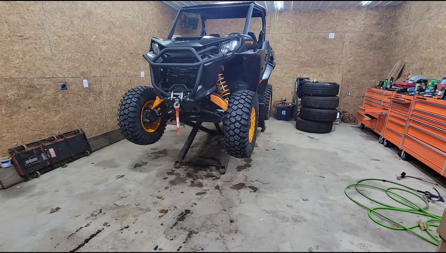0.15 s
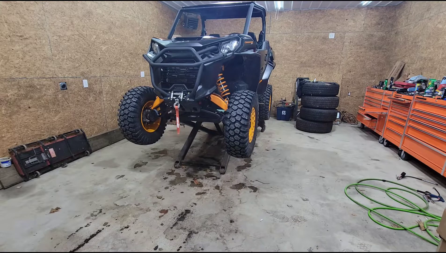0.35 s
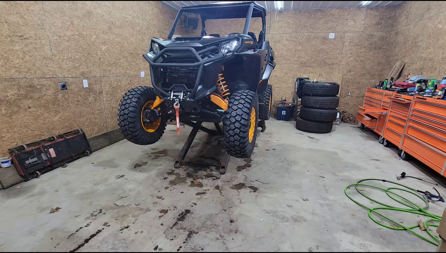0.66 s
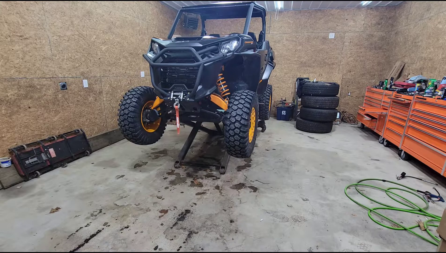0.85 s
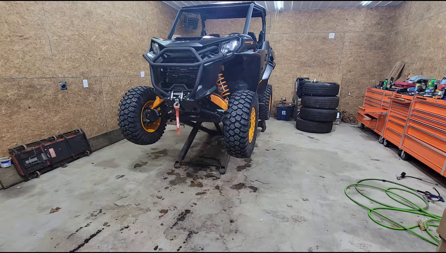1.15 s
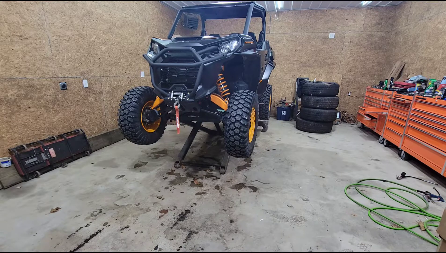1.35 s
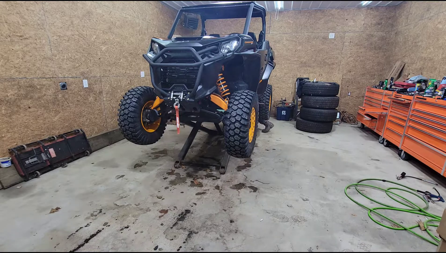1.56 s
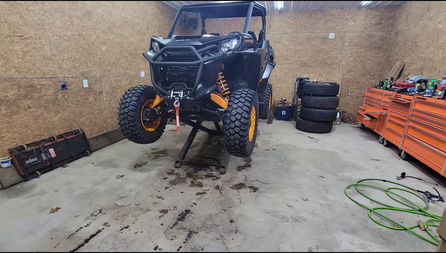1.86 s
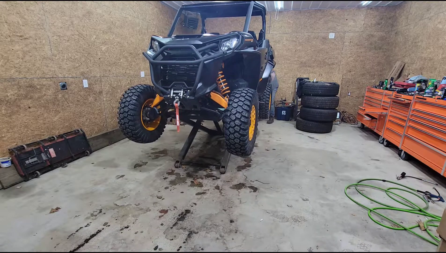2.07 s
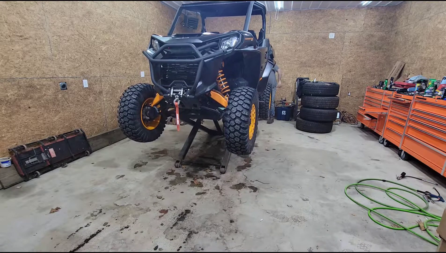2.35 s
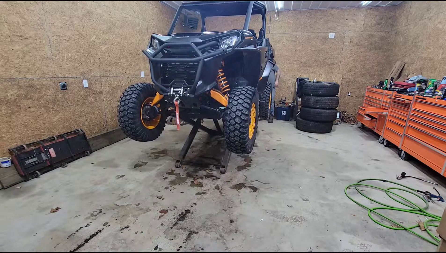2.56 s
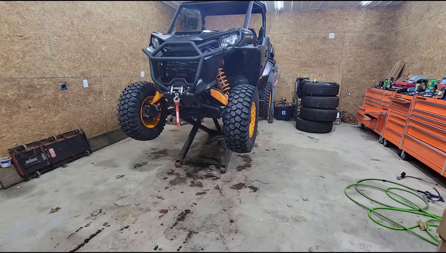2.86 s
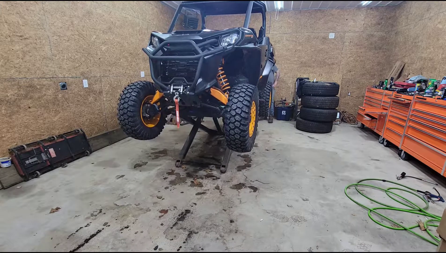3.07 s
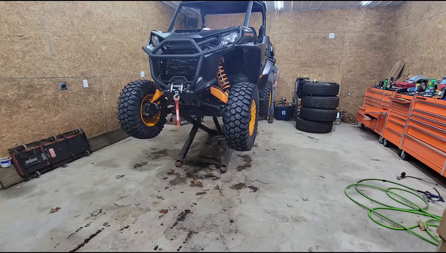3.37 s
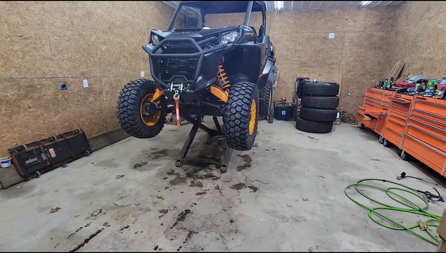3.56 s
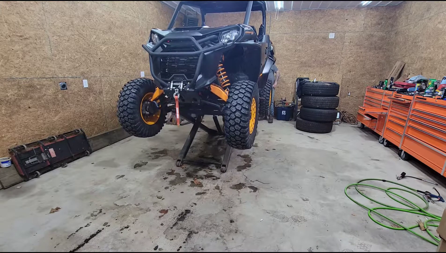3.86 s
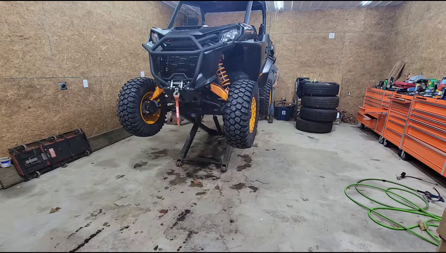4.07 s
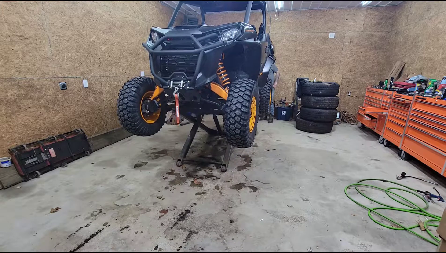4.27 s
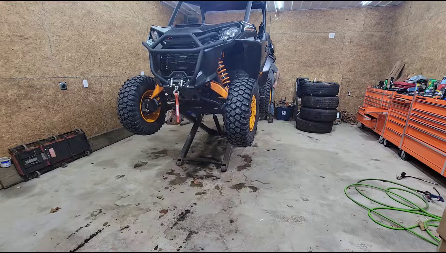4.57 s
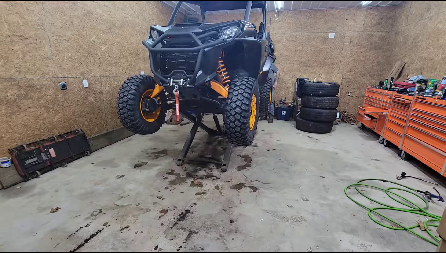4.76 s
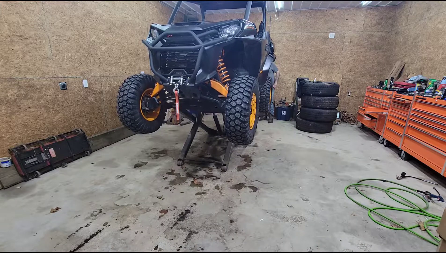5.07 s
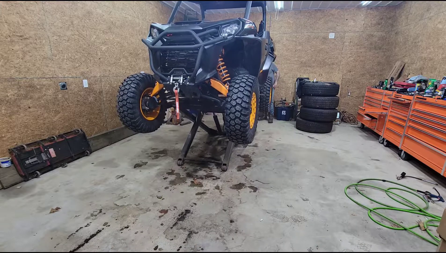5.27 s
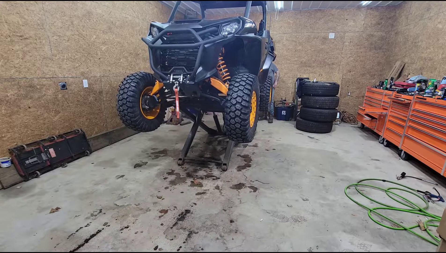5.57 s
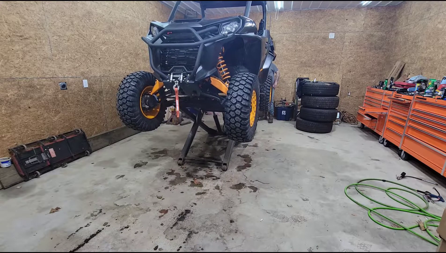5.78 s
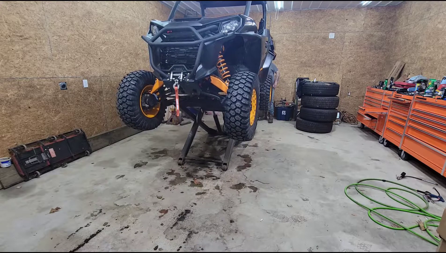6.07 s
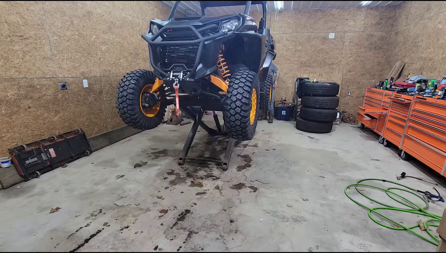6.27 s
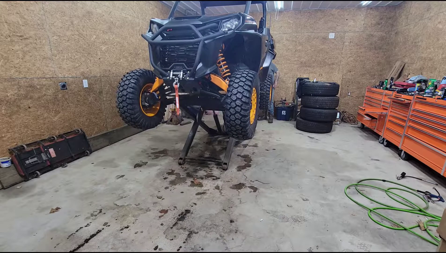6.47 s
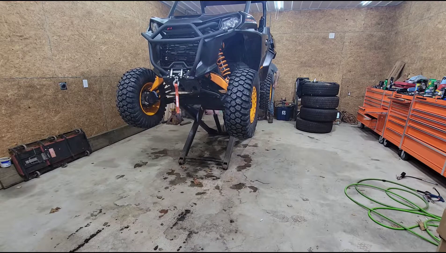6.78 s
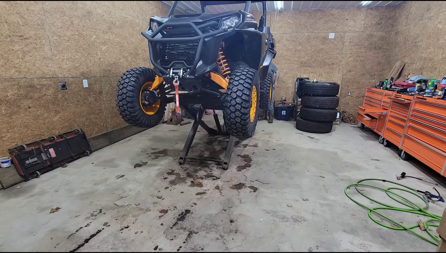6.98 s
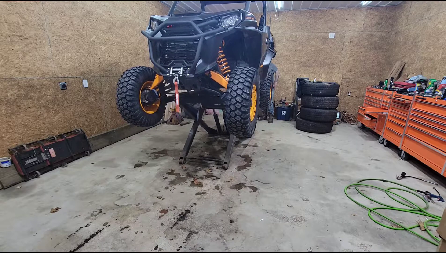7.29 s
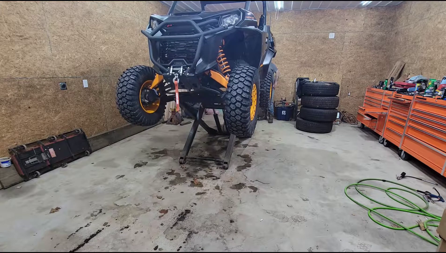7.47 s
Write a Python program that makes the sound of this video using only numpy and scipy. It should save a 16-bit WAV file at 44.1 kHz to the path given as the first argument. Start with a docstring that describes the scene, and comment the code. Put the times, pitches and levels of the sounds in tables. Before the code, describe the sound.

In a hard-walled garage, scuffs and a sharp metal clack, then a switch clicks and an electric-hydraulic lift hums and whines steadily, its safety catch ticking.

```python
"""Garage lift going up

An electric-hydraulic lift raises a vehicle in a hard-walled garage, over room air and a faint sinking hum.
Noise strokes make the scuffs; noise bursts with ringing modes make a sharp metal clack, footsteps and clicks.
The switch closes, the motor hums as sines, and a nine-tooth gear pump whines in partials locked to its shaft.
The whine shifts as pressure builds, the oil hiss flickers, and the safety catch clicks at each notch.
"""
import sys
import numpy as np
from scipy import signal
from scipy.fft import irfft, next_fast_len
from scipy.io import wavfile
from scipy.ndimage import uniform_filter1d

SR = 44100
rng = np.random.default_rng(int(sys.argv[2]) if len(sys.argv) > 2 else 0)


def wrap_up_sound(samples):
    """Save the sound to the file named by the first command line argument, as 16-bit audio."""
    columns = np.atleast_2d(samples).T
    # keep every value between -1 and 1, then stretch to whole-number steps
    tamed = np.clip(columns, -1, 1)
    steps = np.round(tamed * 32767).astype(np.int16)
    wavfile.write(sys.argv[1], SR, steps)


N = 336483
T = np.arange(N) / SR

# Likeness of the two microphones. Each row: frequency in Hz, correlation from 0 to 1.
LIKENESS = [(30, .6), (80, .8), (140, .88), (250, .91), (400, .45), (600, .2), (1000, 0), (2500, .15),
            (14000, .2)]
# Base decay of a blow in the garage. Each row: frequency in Hz, t60 in seconds before a blow's linger factor.
GARAGE_DECAY = [(100, 0.28), (300, 0.35), (600, 0.41), (1200, 0.43), (2700, 0.49), (5500, 0.43),
                (8000, 0.38), (14000, 0.3)]
EDGE_HZ = 15450  # top of the band

# Room air. Each row: frequency in Hz, relative level in dB per Hz.
AIR_COLOUR = [(20, -35.5), (55, -22.5), (85, -13.5), (100, -14), (130, -7), (155, -19.5), (200, -25),
              (500, -31), (1500, -25.5), (3500, -37.5), (9000, -39.5), (15000, -55.5)]
# The faint hum starts at one pitch and sinks exponentially towards another.
DRONE_START_HZ, DRONE_REST_HZ, DRONE_SINK_S = 161.5, 128, 6.9
DRONE_DB, DRONE_DB_PER_S = -61.5, 0.67
# Brief level shifts of the faint hum. Each row: centre in seconds, half length in seconds, change in dB.
DRONE_DIPS = [(.25, 0.18, 2.5), (1.45, 0.23, -10), (2.502, 0.33, -9), (4.397, 0.45, -15), (7.6, 0.5, -7)]

# Scuffs of cloth and soles. Each row: start in seconds, length in seconds, level in dB.
SCUFFS = [(-.03, 0.1, -37.5), (0.104, 0.062, -38), (.7, 0.036, -54), (0.917, 0.045, -58.5),
          (1.07, 0.043, -56), (1.387, 0.061, -51.5), (2.6, 0.075, -47.5)]
# Friction noise. Each row: frequency in Hz, relative level in dB per Hz.
SCUFF_COLOUR = [(180, -26.5), (300, -27.5), (482, -7), (532, -12.5), (975, -10), (1290, -8.5), (1420, -12),
                (2320, -3), (6620, -1), (15000, -9.5)]
SCUFF_RISE_S, SCUFF_FALL_DB_PER_S = 0.036, 157

# Footsteps. Each row: start in seconds, level in dB.
STEPS = [(.16, -55.5), (.7, -53.5), (1.027, -57.5), (1.105, -60), (1.88, -48.5), (1.974, -44.5),
         (2.225, -43)]
# Footstep noise. Each row: frequency in Hz, relative level in dB per Hz.
STEP_COLOUR = [(150, -52), (400, -6.5), (700, -0.5), (1100, -6), (1800, -14.5), (5000, -13.5), (14000, -20)]
# Hollow knock of a step. Each row: frequency in Hz, relative level in dB, t60 in seconds.
STEP_MODES = [(437, 4, 0.082), (546, 4, 0.16), (698, 5, .17), (934, 5, .13)]

# The sharp metal clack: a faint lead-in, the main hit and a weaker second hit.
# Each row: start in seconds, level in dB.
CLACKS = [(.4575, -32), (.462, -11.5), (.474, -18.5)]
# Clack noise. Each row: frequency in Hz, relative level in dB per Hz.
CLACK_COLOUR = [(40, -45.5), (100, -33.5), (190, -4), (270, -20), (340, -9), (480, -12), (750, -4.5),
                (1050, -5.5), (2050, -2.5), (2900, -5.5), (3700, 0.5), (6500, 5), (7900, -3.5), (8750, 5.5),
                (9800, -6), (11500, 1.5), (15000, -10.5)]
# Low jolts of the frame. Each row: start in seconds, level in dB.
JOLTS = [(.04, -47.5), (.492, -42.5), (1.68, -38)]
# Jolt noise. Each row: frequency in Hz, relative level in dB per Hz.
JOLT_COLOUR = [(25, -60), (50, -42), (90, -19), (130, -7.5), (200, 1.5), (400, -14), (800, -12),
               (2000, -33)]
# Ringing of the steel frame. Each row: frequency in Hz, relative level in dB, t60 in seconds.
STEEL_MODES = [(334, 0, .26), (721, -5, .37), (856, -3, .3), (1039, 2, .38), (1110, 1, .46),
               (1497, -2, .42), (1534, 0, .46), (1803, -3, .28), (2277, -5, .28), (3548, -5, .3),
               (3915, 4, .42), (5771, 1, .36), (5899, 2, .38), (6045, 0, .33), (6175, -1, .35),
               (6535, -1, .3), (6686, -2, .3), (6879, -2, .3), (7121, 1, .28), (8659, 1, .36),
               (8802, -4, .3), (10827, -4, .28)]

# Knock of the button being pressed. Each row: start in seconds, level in dB.
BUTTON = [(1.543, -54)]
# Ringing of the button. Each row: frequency in Hz, relative level in dB, t60 in seconds.
BUTTON_MODES = [(800, -7, .08), (950, 2, 0.067)]
# Clicks of the switch. Each row: start in seconds, level in dB.
SWITCH = [(1.633, -34), (1.655, -36.5), (1.688, -38), (1.715, -47)]
# Noise of switch and button. Each row: frequency in Hz, relative level in dB per Hz.
SWITCH_COLOUR = [(120, -32), (220, -19), (500, -37), (700, -16), (930, 1), (1200, -6), (1600, -17),
                 (2100, -14), (2750, -14), (4500, -19), (7500, -16.5), (15000, -24.5)]
# Ringing of the switch box. Each row: frequency in Hz, relative level in dB, t60 in seconds.
SWITCH_MODES = [(745, -7, 0.06), (964, 8, 0.05), (1103, 3, 0.064), (1395, -3.5, .08)]

# Ticks of the safety catch riding over a notch. Each row: start in seconds, level in dB.
CATCH_TICKS = [(2.93, -39.5), (2.945, -45), (2.961, -52), (2.978, -47), (5.222, -42), (5.234, -44),
               (5.246, -42.5), (7.501, -42.5), (7.516, -46)]
# Clatter of the safety catch. Each row: frequency in Hz, relative level in dB per Hz.
CATCH_COLOUR = [(300, -20), (900, -3.5), (1650, 4), (2500, -3), (3300, 1), (5000, -2), (5800, -2),
                (7500, -2), (8700, -3.5), (9600, -10), (13000, -6), (15000, -33)]
# Ringing of the safety catch. Each row: frequency in Hz, relative level in dB, t60 in seconds.
CATCH_MODES = [(3290, 1.5, 0.2), (4060, -2, 0.15), (8600, 1.5, .22)]
# The catch drops on its bar and bounces. Each row: start in seconds, level in dB.
DROPS = [(2.932, -49), (2.961, -50), (5.231, -39), (5.246, -44), (5.26, -59)]
# Ringing of the bar. Each row: frequency in Hz, relative level in dB, t60 in seconds.
BAR_MODES = [(1500, -12, 0.062), (1592, -1, 0.23), (1628, -3, 0.14), (1876, 0.5, 0.082)]
# Squeak of the catch on the last notch. Each row: start in seconds, level in dB.
SQUEAKS = [(7.517, -56.5)]
# Ringing of the squeak. Each row: frequency in Hz, relative level in dB, t60 in seconds.
SQUEAK_MODES = [(5700, 0, 0.062), (5760, 3, 0.14), (6000, -4, .06)]

MOTOR_START_S, SHAFT_HZ = 1.635, 59.414  # power on, full shaft speed
# Oil pressure. Each row: time in seconds, share of full pressure from 0 to 1.
PRESSURE = [(2.6, 0.19), (6.6, 1)]
# Magnetic hum at four times the mains frequency: unloaded level, rise at full pressure, steepness of that law.
HUM_DB, HUM_RISE_DB, HUM_POWER = -57.5, 8, 2.3
# Low thrum of the motor. Each row: frequency in Hz, relative level in dB per Hz.
THRUM_COLOUR = [(40, -31), (58, -8), (70, -3), (83, -5), (95, -7), (108, -12), (125, 10), (150, 13.5),
                (175, -12), (270, 2.0), (350, -34), (900, -70)]

# Strong partials of motor and pump; close pairs beat.
# Each row: multiple of the shaft speed, level in dB at zero pressure, level in dB at full pressure.
STRONG_PARTIALS = [(9, -58, -62), (16.15, -69, -67), (17, -70, -65), (17.15, -67, -63), (18, -58, -55.5),
                   (19.93, -63, -61), (20.19, -66, -66), (24, -70, -68), (27, -69, -70), (28, -65.5, -64),
                   (32, -60, -66), (45, -75, -65), (70, -67, -66), (71, -65, -67), (72, -68, -62),
                   (73, -62, -67), (74, -64, -66), (79, -65, -65), (81, -65, -67), (88, -66, -71),
                   (90, -70, -68), (108, -61, -66), (109, -66, -65), (110, -66, -64), (112, -70, -67),
                   (115, -60, -59.5), (116, -65, -60), (117, -61, -63), (120, -67, -63), (121, -69, -62),
                   (121.04, -72, -67), (122, -67, -64), (122.04, -69, -66), (125, -64, -62),
                   (126, -65, -62), (127, -65, -68), (132, -68, -68), (133, -68, -69), (144, -69, -71),
                   (198, -69, -74)]
# A partial sings out as pressure builds.
# Each row: peak time in seconds, half length in seconds, multiple of the shaft speed, added level in dB.
SWELLS = [(2.03, 0.3, 9, -60.5), (3.14, 0.65, 9, -67), (6.9, 0.49, 9, -67.5), (4.5, 1.46, 24, -60.5),
          (5.3, 0.21, 27, -58), (6.6, .45, 27, -59.5), (4.2, 0.47, 45, -70), (5.73, 0.58, 45, -78),
          (3, 0.25, 72, -57.5), (4.7, 0.56, 72, -63), (7, .45, 72, -64.5), (7.37, 0.13, 72, -67),
          (4.03, 0.59, 73, -62), (2.64, 0.21, 79, -62), (3, 0.64, 88, -61.5), (4.43, 0.44, 90, -61),
          (6.32, .35, 90, -53.5), (3.38, 0.81, 108, -53), (4.87, 0.25, 108, -49), (3.3, 0.27, 109, -66),
          (5.05, 0.26, 112, -56), (5.2, 0.21, 116, -73), (6.89, 0.49, 117, -50.5), (2.98, 0.28, 126, -56),
          (4.22, 0.18, 126, -61), (6.6, 0.17, 126, -69), (5.1, 0.44, 127, -59)]
# The pump's fourth tooth harmonic and its neighbour throb together.
# Each row: multiple of the shaft speed, relative level in dB at zero pressure, the same at full pressure.
THROBBING = [(36, 0, 0), (37, -1, -9)]
THROB_HZ, THROB_TOP_S = 4.78, 3.755  # throbs per second, time of one peak
# Throbbing whine. Each row: time in seconds, level in dB.
THROB_LEVEL = [(2.1, -53), (2.32, -48), (2.75, -55), (3.3, -53.5), (3.73, -51), (4.0, -52.5), (5.0, -51),
               (5.8, -55), (6.3, -54), (6.8, -58.5), (7.4, -54.5)]
# Weak shaft harmonics, the strong partials left out.
# Each row: frequency in Hz, relative mean level of a harmonic in dB.
BUZZ_COLOUR = [(300, -103), (420, -72), (710, -69.5), (1100, -68.5), (1750, -92), (2150, -58), (2500, -100),
               (3400, -91), (3900, -69.5), (4500, -81.5), (5500, -68), (6100, -80.5), (7000, -74),
               (8100, -75.5), (9100, -81.5), (11300, -77.5), (14500, -78.5)]
# Oil rushing through pump and valve. Each row: frequency in Hz, relative level in dB per Hz.
OIL_COLOUR = [(90, -17), (200, 0.5), (280, -1.5), (370, -29), (560, 1), (800, -13), (1050, 4), (1300, -14),
              (1500, 3.5), (1800, -6), (2150, 8), (2450, -1), (3550, -2.5), (4200, 4), (5200, 0),
              (6000, -1.5), (7000, -2), (8300, 0.5), (9000, -8), (10500, -1), (12500, -3), (15500, -16.5)]
# A broad lift in the buzz and hiss that moves between 6.3 and 7.1 kHz.
# Each row: time in seconds, centre in Hz.
BAND_GLIDE = [(3.2, 6340), (4.8, 6640), (5.6, 6400), (6.8, 6900), (7.6, 7140)]


def gain_of(db):
    """Decibels to a factor."""
    return 10 ** (np.asarray(db) / 20)


def evened(x):
    """Scales to rms 1."""
    return x / np.sqrt(np.mean(x ** 2) + 1e-20)


def read(points, hz):
    """Reads a spectrum on a log-frequency axis."""
    f, value = np.transpose(points)
    return np.interp(np.log(hz + 1), np.log(f + 1), value)


def curves(rows):
    """The columns of a timed table, at every sample."""
    s, *columns = np.transpose(rows)
    return [np.interp(T, s, column) for column in columns]


def bell(s, half_length):
    """A smooth rise and fall of height 1 around time s, down to 1/e at the half length."""
    return np.exp(-((T - s) / half_length) ** 2)


def add(mix, s, sound):
    """Adds a stereo sound from time s on."""
    part = mix[:, round(s * SR):][:, :sound.shape[1]]
    part += sound[:, :part.shape[1]]


def wander(rate):
    """Random motion of rms 1, gliding between `rate` random points a second."""
    return evened(np.interp(T * rate, np.arange(1024), rng.standard_normal(1024)))


def noise(colour, size=N):
    """Coloured stereo noise of rms 1, alike in the bass and diffuse above; it reaches the left first."""
    padded = next_fast_len(size)
    hz = np.fft.rfftfreq(padded, 1 / SR)
    a, b = rng.standard_normal((2, len(hz))) + 1j * rng.standard_normal((2, len(hz)))
    same = np.clip(read(LIKENESS, hz), -1, 1)
    mid = a * np.sqrt(1 + same)
    side = b * np.sqrt(1 - same)
    later = np.exp(-2j * np.pi * hz * .00014)  # delay in seconds
    spectrum = np.array([mid + side, (mid - side) * later]) * gain_of(read(colour, hz))
    return evened(irfft(spectrum, padded)[:, :size])


def ports(hz):
    """Phase of each steady tone at the two microphones, set by the room's standing waves."""
    apart = np.arccos(np.clip(read(LIKENESS, hz), -1, 1)) * rng.choice([-1, 1], len(hz))
    return np.exp(2j * np.pi * rng.random(len(hz)) + .5j * np.array([apart, -apart]))


def background(air_db=-66, waver_db=2):
    """Room air as coloured noise, and the faint sinking hum as one unsteady sine."""
    hz = DRONE_REST_HZ + (DRONE_START_HZ - DRONE_REST_HZ) * np.exp(-T / DRONE_SINK_S)
    hz = hz + 1.5 * wander(4.7)
    dips = sum(dip_db * bell(s, half_length) for s, half_length, dip_db in DRONE_DIPS)
    level_db = DRONE_DB + DRONE_DB_PER_S * T + dips + waver_db * wander(6.9)
    hum = np.sqrt(2) * np.sin(2 * np.pi * np.cumsum(hz) / SR)
    return gain_of(air_db) * noise(AIR_COLOUR) + gain_of(level_db) * hum


def scuffs(grain_db=1.0):
    """Grainy friction noise: each stroke rises, holds, and dies away in the room."""
    strokes = []
    for s, length, db in SCUFFS:
        rise = np.clip((T - s) / SCUFF_RISE_S, 0, 1)
        fall_db = SCUFF_FALL_DB_PER_S * np.maximum(T - s - length, 0)
        strokes.append(rise * gain_of(db - fall_db))
    envelope = np.linalg.norm(strokes, axis=0)  # strokes add in power
    grain = evened(gain_of(grain_db * wander(97)))
    return envelope * grain * noise(SCUFF_COLOUR)


def blows(rows, colour, rise, hold, linger, ring_db, modes=STEEL_MODES, grain_db=-3.5):
    """Each blow scatters into uneven reflections that die band by band, and sets its modes ringing.

    rise and hold are in seconds; linger scales the garage decay; ring_db sets the modes against the noise.
    """
    out, t = np.zeros((2, N)), T[:SR]
    mode_hz, mode_db, mode_t60 = np.transpose(modes)[:, :, None]
    rings = gain_of(mode_db - 60 * t / mode_t60) * np.exp(2j * np.pi * mode_hz * t)
    for s, db in rows:
        hz, age, z = signal.stft(noise(colour, size=SR), SR, nperseg=512)
        t60 = linger * read(GARAGE_DECAY, hz)[:, None]
        fall = gain_of(-60 * np.maximum(age - hold, 0) / t60)
        decayed = signal.istft(z * fall, SR, nperseg=512)[1][:, :SR]
        # early reflections arrive one by one, later ones merge
        clumps = evened(uniform_filter1d(rng.standard_normal(SR), size=90)) * np.exp(-t / 0.048)
        reflections = gain_of(grain_db * clumps) * decayed
        ring = (ports(mode_hz[:, 0]) @ rings).real
        onset = 1 - np.exp(-t / rise)
        add(out, s, gain_of(db) * onset * (reflections + gain_of(ring_db) * ring))
    return out


def footsteps():
    """Soft noise thuds with a hollow modal knock."""
    return blows(STEPS, STEP_COLOUR, rise=0.0038, hold=0.02, linger=0.98, ring_db=-3,
                 modes=STEP_MODES, grain_db=3.5)


def frame_blows():
    """The sharp clack and the low jolts, both ringing the steel frame."""
    clack = blows(CLACKS, CLACK_COLOUR, rise=0.00065, hold=0.0047, linger=0.9, ring_db=-18, grain_db=-1.0)
    jolt = blows(JOLTS, JOLT_COLOUR, rise=0.0037, hold=0.0084, linger=0.66, ring_db=-46, grain_db=2.0)
    return clack + jolt


def switch_box():
    """The button knocks, then the switch clicks and its box rings briefly."""
    button = blows(BUTTON, SWITCH_COLOUR, rise=0.0056, hold=0.0084, linger=1.0, ring_db=14,
                   modes=BUTTON_MODES, grain_db=3.5)
    clicks = blows(SWITCH, SWITCH_COLOUR, rise=0.0018, hold=0.0097, linger=0.75, ring_db=-4,
                   modes=SWITCH_MODES, grain_db=1.0)
    return button + clicks


def safety_catch():
    """The catch ticks over each notch, drops on its ringing bar, and squeaks on the last notch."""
    ticks = blows(CATCH_TICKS, CATCH_COLOUR, rise=0.00077, hold=0.0018, linger=0.84, ring_db=-8.0,
                  modes=CATCH_MODES, grain_db=2.0)
    drops = blows(DROPS, CATCH_COLOUR, rise=0.00088, hold=0.0027, linger=0.28, ring_db=-1.0,
                  modes=BAR_MODES, grain_db=3.0)
    squeak = blows(SQUEAKS, CATCH_COLOUR, rise=.002, hold=0.0035, linger=.4, ring_db=16.5,
                   modes=SQUEAK_MODES, grain_db=3.5)
    return ticks + drops + squeak


def windings(low_db=-64, thrum_db=-13, inrush_db=-44, inrush_at=1.735, inrush_length=0.043):
    """The motor's iron hums at twice and four times the mains: a surge at the start, then more with load."""
    pressure, = curves(PRESSURE)
    load = gain_of(HUM_DB + HUM_RISE_DB * pressure ** HUM_POWER)
    angle = 2 * np.pi * 119.98 * T  # twice the mains frequency, in Hz
    surge = gain_of(inrush_db) * bell(inrush_at, inrush_length)
    low_hum = (gain_of(low_db + wander(14)) + surge) * np.sin(angle)
    load_hum = load * np.sin(2 * angle)
    thrum = load * gain_of(thrum_db) * noise(THRUM_COLOUR)
    power_on = np.clip((T - MOTOR_START_S) * 20, 0, 1)
    return (np.sqrt(2) * (low_hum + load_hum) + thrum) * power_on


def buzz(turns, scatter_db=3.5):
    """Weak shaft harmonics, as the shape of one turn played round and round."""
    order = np.arange(1, 260)
    weak = ~np.isin(order, np.round([row[0] for row in STRONG_PARTIALS]))
    level_db = read(BUZZ_COLOUR, order * SHAFT_HZ) + scatter_db * rng.standard_normal(len(order))
    harmonics = weak * gain_of(level_db) * ports(order * SHAFT_HZ)
    spectrum = np.pad(harmonics, ((0, 0), (1, 0)))  # nothing at 0 Hz
    cycle = irfft(spectrum, 32768, norm="forward") / np.sqrt(2)
    return cycle[:, (turns % 1 * cycle.shape[1]).astype(int)]


def shifting(x, depth_db=1.5, flicker_db=3.0, band_db=6.0, band_width_hz=230):
    """Narrow bands of buzz and hiss swell and flicker at random; a moving band stands out."""
    hz, s, z = signal.stft(x, SR, nperseg=1024)
    slow, quick = rng.standard_normal((2, *z.shape[1:]))
    # smooth across frequency, then across time
    slow = evened(uniform_filter1d(uniform_filter1d(slow, size=5, axis=0), size=70, axis=1))
    quick = evened(uniform_filter1d(uniform_filter1d(quick, size=2, axis=0), size=5, axis=1))
    centre_hz = np.interp(s, *np.transpose(BAND_GLIDE))
    band = np.exp(-((hz[:, None] - centre_hz) / band_width_hz) ** 2)
    change_db = depth_db * slow + flicker_db * quick + band_db * band
    return signal.istft(z * gain_of(change_db), nperseg=1024)[1][:, :N]


def throb(turns, floor_db=-12, lean_db=1.5):
    """Two partials swell and dip together a few times a second, stronger on the right."""
    pressure, = curves(PRESSURE)
    level_db, = curves(THROB_LEVEL)
    arch = abs(np.cos(np.pi * THROB_HZ * (T - THROB_TOP_S)))
    sides_db = level_db + np.array([[-lean_db], [lean_db]])
    level = np.hypot(arch, gain_of(floor_db)) * gain_of(sides_db)
    phases = np.angle(ports(SHAFT_HZ * np.array([k for k, _, _ in THROBBING])))
    tones = np.zeros((2, N))
    for (k, low, high), phase in zip(THROBBING, phases.T):
        height = gain_of(low + (high - low) * pressure)
        tones += height * np.sin(2 * np.pi * k * turns + phase[:, None])
    return np.sqrt(2) * level * tones


def partial_heights(pressure):
    """Heights of the strong partials: each follows the pressure and sings out in its swells."""
    multiples = np.array([k for k, _, _ in STRONG_PARTIALS])
    heights = [gain_of(low + (high - low) * pressure) for _, low, high in STRONG_PARTIALS]
    for s, half_length, k, db in SWELLS:
        heights[np.argmin(abs(multiples - k))] += gain_of(db) * bell(s, half_length)
    return multiples, heights


def whine(turns, drift=0.011, rough=0.18, fade_db=2.5):
    """Strong partials locked to the shaft, roughened in level and leaning from side to side."""
    pressure, = curves(PRESSURE)
    multiples, heights = partial_heights(pressure)
    phases = np.angle(ports(SHAFT_HZ * multiples))
    out = np.zeros((2, N))
    for k, height, phase in zip(multiples, heights, phases.T):
        # shorter waves drift more in phase as the reflections move
        angle = 2 * np.pi * (k * turns % 1) + drift * k * wander(2.994)
        lean = gain_of(fade_db * wander(2.25))
        grit = 1 + rough * wander(70)
        tone = np.sin((angle + phase[:, None]).astype(np.float32))
        out += np.sqrt(2) * height * grit * np.array([lean, 1 / lean]) * tone
    return out


def oil(turns, shaft_ripple=0.055, tooth_ripple=0.21):
    """Oil hiss that pulses with each turn and rasps with each of the nine teeth."""
    shaft = shaft_ripple * np.cos(2 * np.pi * turns)
    teeth = tooth_ripple * np.cos(2 * np.pi * 9 * turns)
    return evened(1 + shaft + teeth) * noise(OIL_COLOUR)


def pump(spin_up=.085, flutter=0.0003, buzz_db=-3, oil_db=-51.5):
    """Everything repeats with the shaft: rough tooth partials, a fine buzz, and rasping oil hiss."""
    speed = np.clip((T - MOTOR_START_S) / spin_up, 0, 1)  # share of full speed
    turns = np.cumsum(SHAFT_HZ * speed * (1 + flutter * wander(50))) / SR
    rush = shifting(gain_of(buzz_db) * buzz(turns) + gain_of(oil_db) * oil(turns))
    return speed ** 2 * (rush + throb(turns) + whine(turns))


def scene():
    """The garage, the person beside the lift, its clacks, and the lift itself."""
    surroundings = background() + scuffs() + footsteps()
    knocks = frame_blows() + switch_box() + safety_catch()
    return surroundings + knocks + windings() + pump()


def record(dry):
    """Rounds off the highest peaks, then limits the band."""
    rounded = dry / (1 + (dry / .85) ** 6) ** (1 / 6)
    low_pass = signal.firwin(511, EDGE_HZ, window=("kaiser", 9), fs=SR)
    return signal.oaconvolve(rounded, low_pass[None], "same")


dry = scene()
out = record(dry)
wrap_up_sound(out)
```